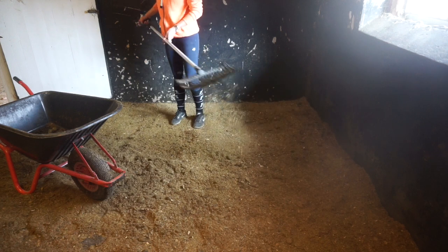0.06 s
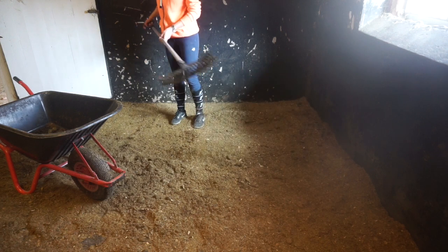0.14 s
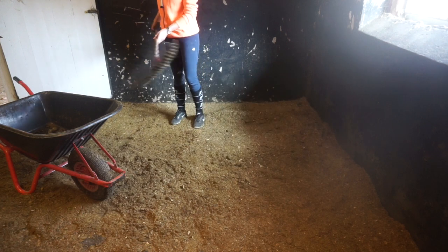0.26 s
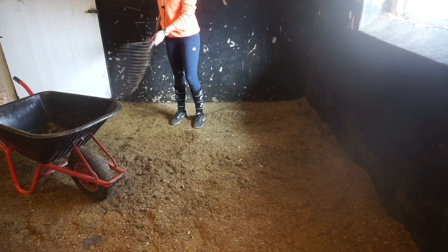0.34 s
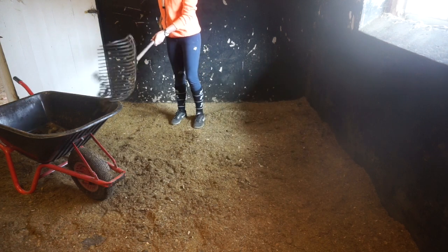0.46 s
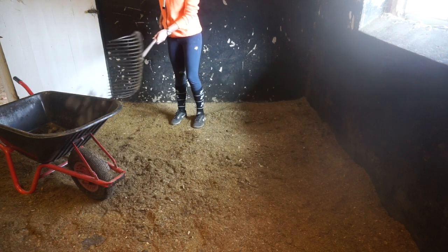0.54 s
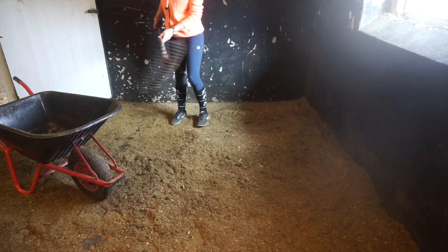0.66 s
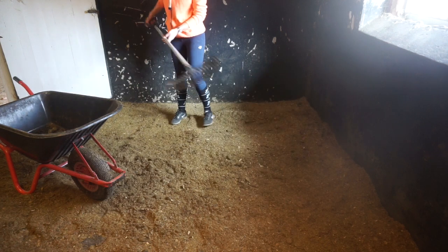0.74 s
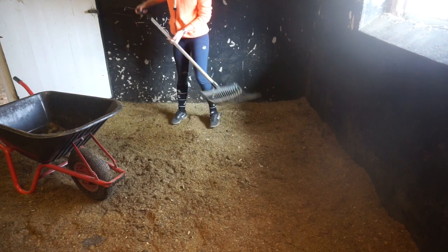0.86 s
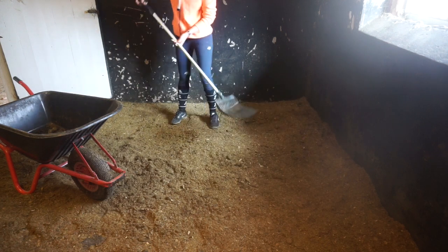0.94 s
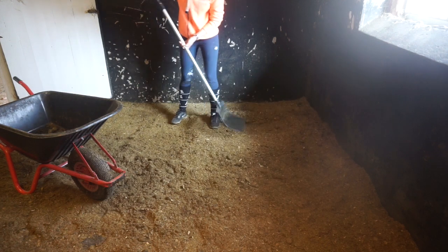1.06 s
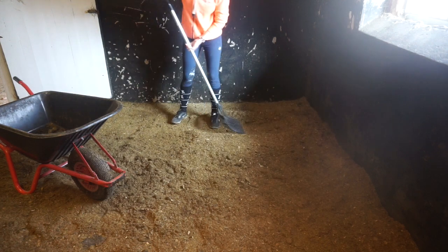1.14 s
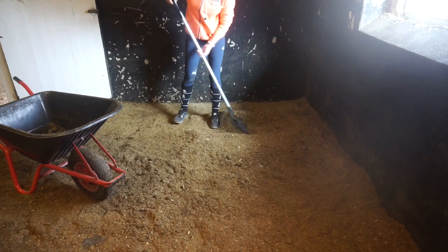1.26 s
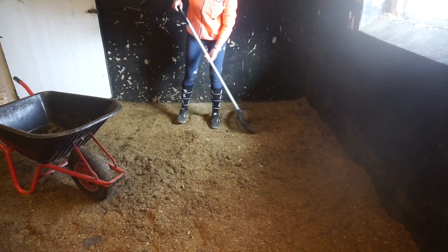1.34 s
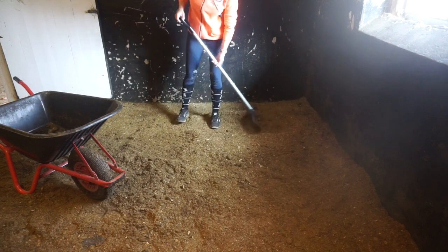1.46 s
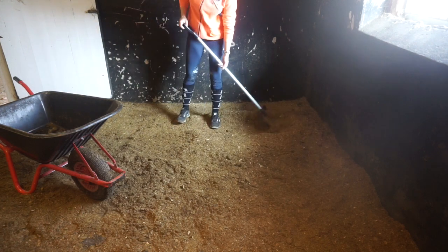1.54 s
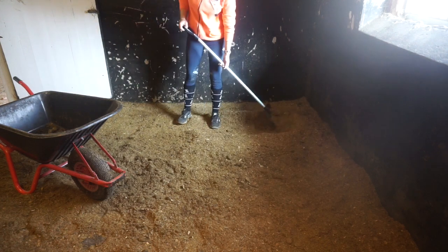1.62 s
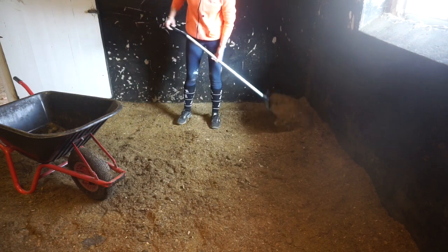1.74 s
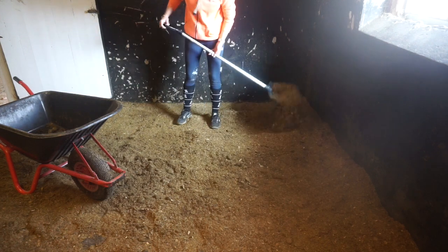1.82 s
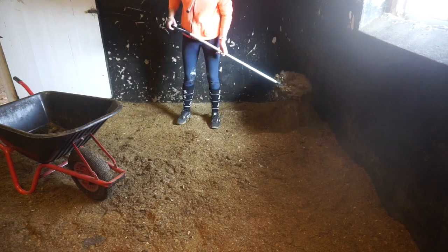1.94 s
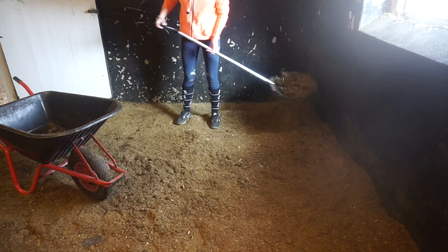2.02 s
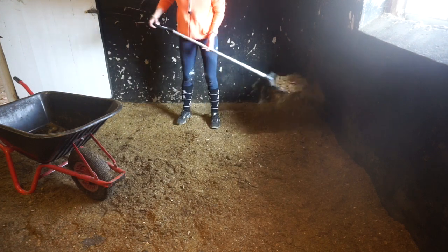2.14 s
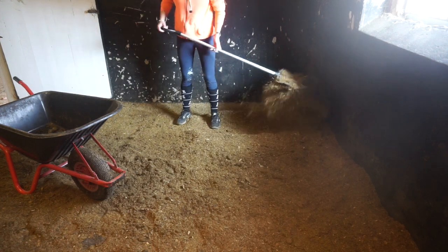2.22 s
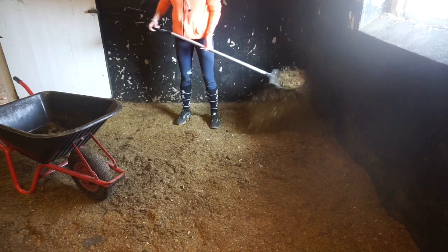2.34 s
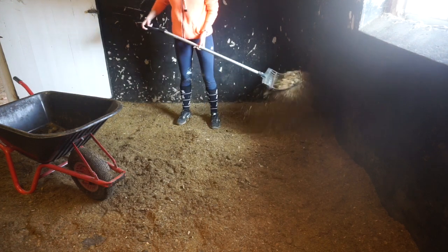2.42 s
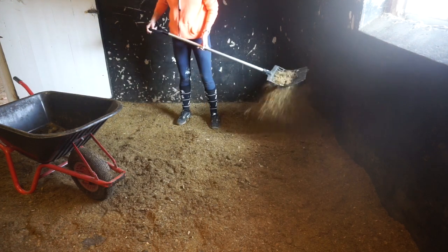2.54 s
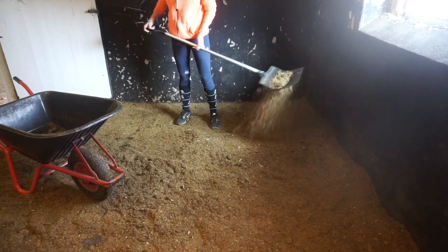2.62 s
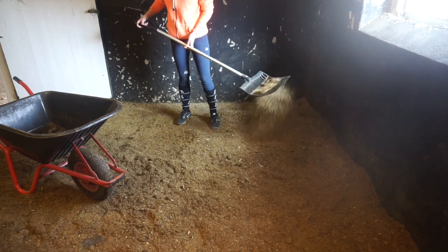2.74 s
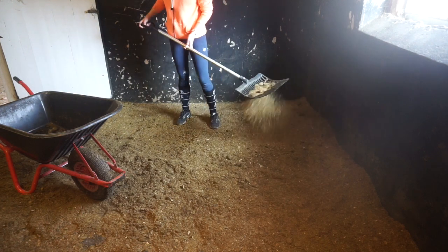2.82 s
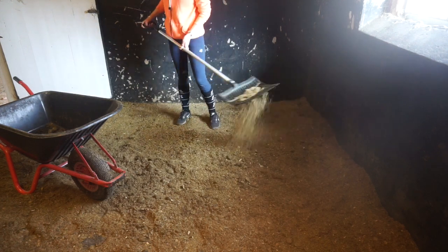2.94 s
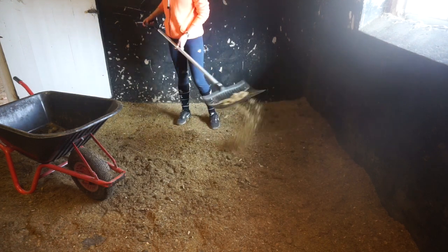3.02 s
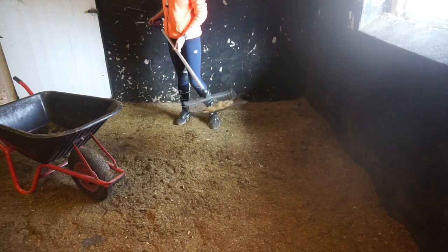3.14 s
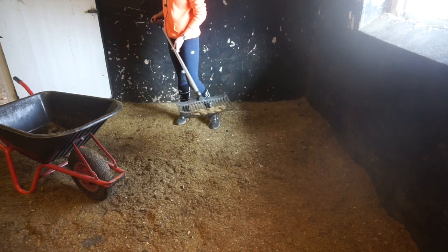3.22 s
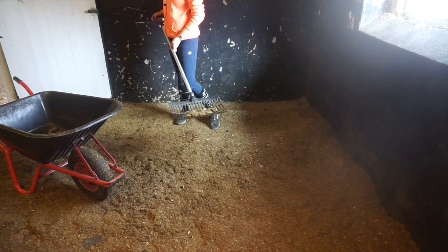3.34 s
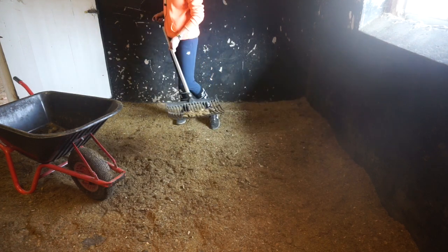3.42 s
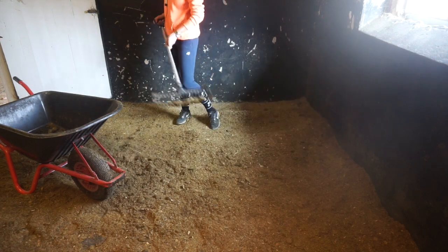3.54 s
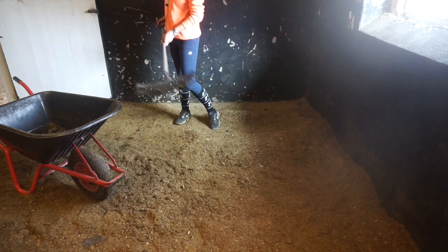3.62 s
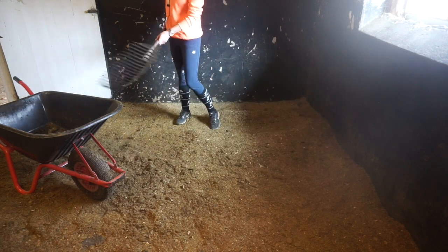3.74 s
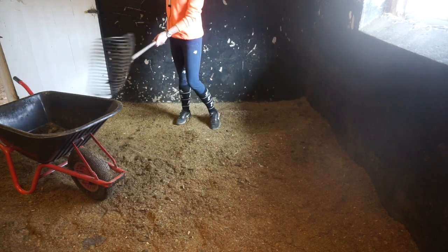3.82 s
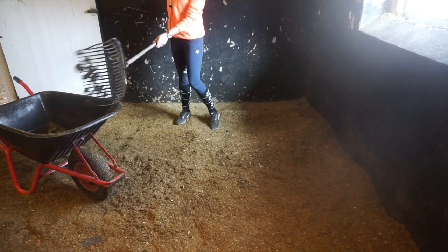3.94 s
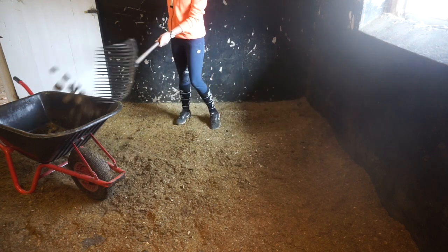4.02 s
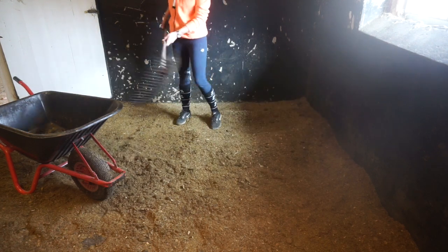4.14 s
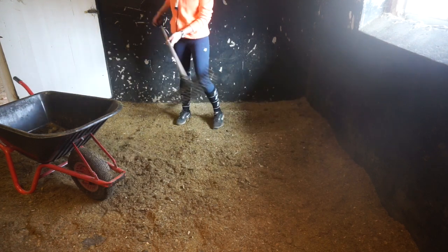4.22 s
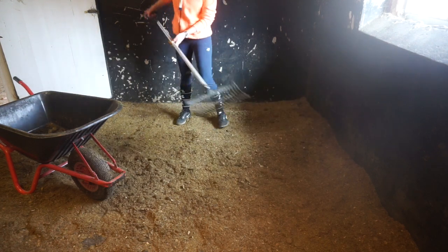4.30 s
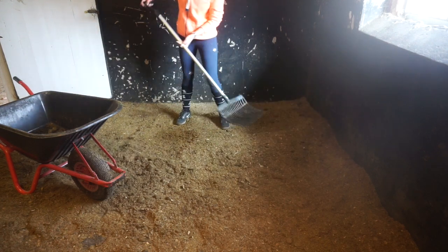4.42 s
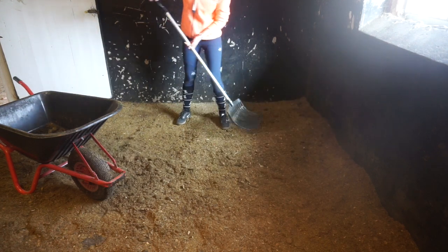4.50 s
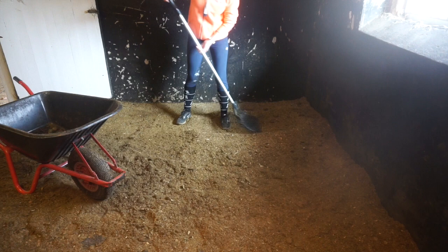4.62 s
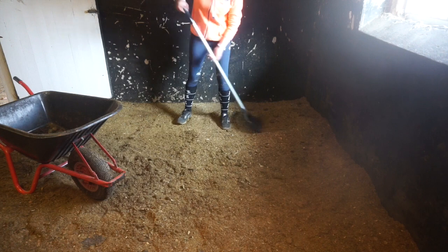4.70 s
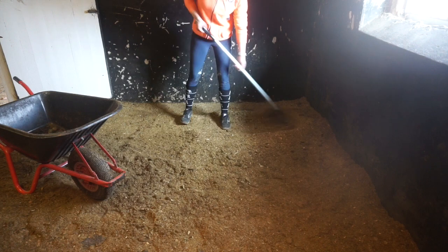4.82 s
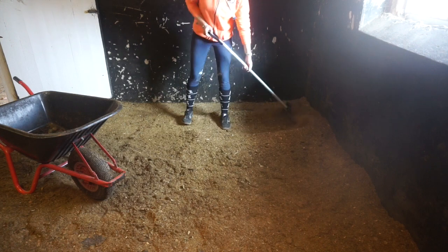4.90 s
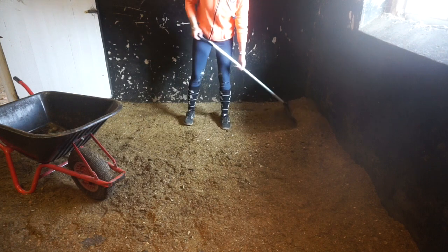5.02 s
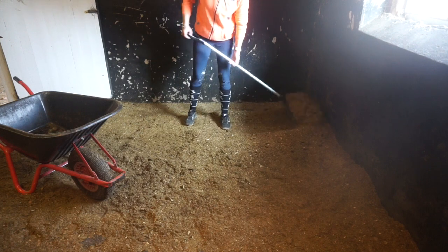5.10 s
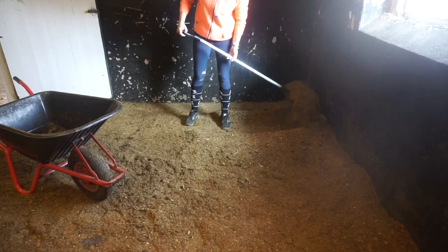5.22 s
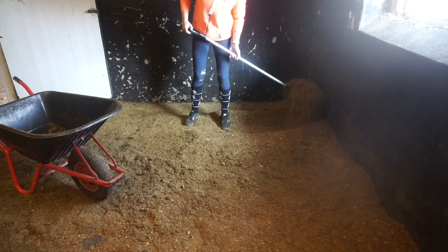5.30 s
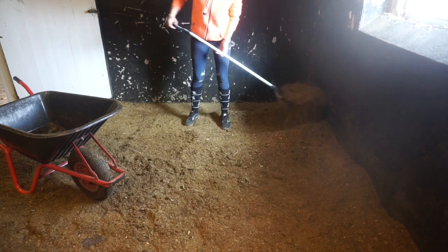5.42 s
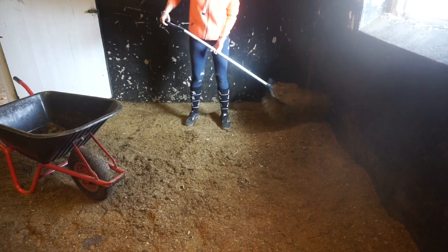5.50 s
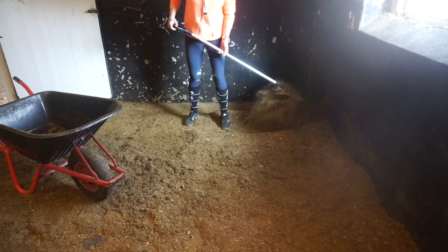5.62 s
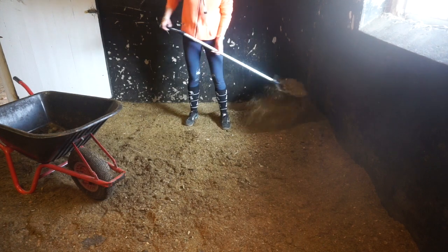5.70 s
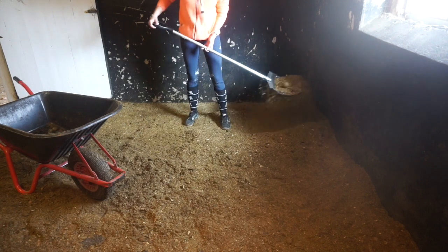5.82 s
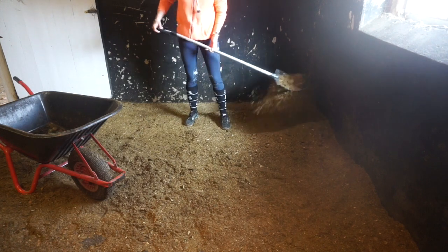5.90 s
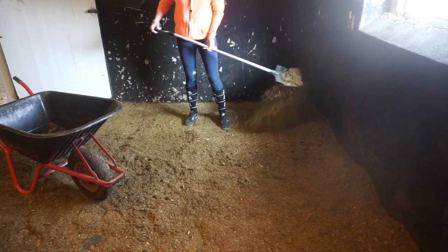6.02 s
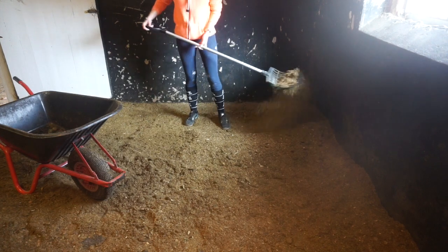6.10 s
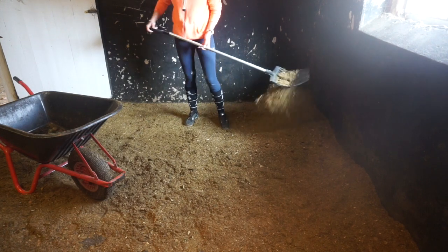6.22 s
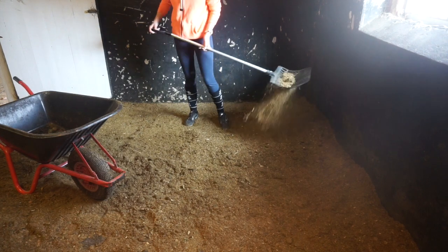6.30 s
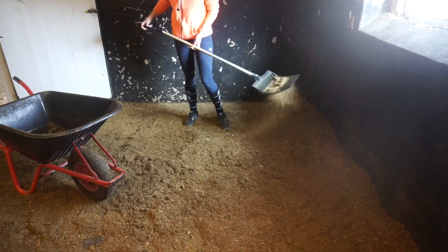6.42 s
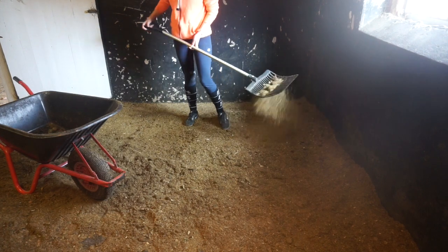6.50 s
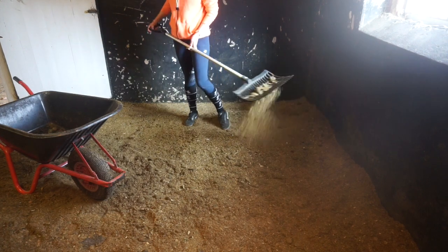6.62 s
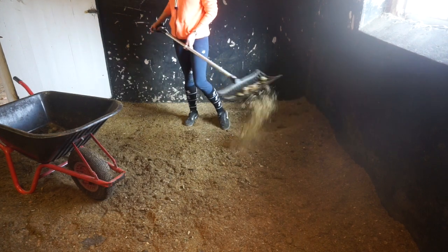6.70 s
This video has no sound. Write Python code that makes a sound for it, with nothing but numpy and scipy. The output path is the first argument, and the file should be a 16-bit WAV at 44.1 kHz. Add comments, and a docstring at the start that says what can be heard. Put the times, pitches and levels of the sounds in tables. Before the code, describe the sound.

A horse stall is mucked out a few metres away, with a short hard-walled echo and a soft steady hush. Wood shavings hiss faintly and a swish builds until a plastic-tined fork knocks on a wheelbarrow at 0.5 seconds; droppings thud into the hollow, ringing tub until about 0.9. At 1.3 the fork scrapes into the bedding with sharp tine snaps and a muffled crunch. From about 1.8 to 3.4 it is shaken repeatedly, flakes rustling quietly on the tines and hissing to the floor. At 4 seconds comes another loud knock, with rattling debris and several thuds, the heaviest at 4.3. A second, shorter scrape with two sharp snaps follows at 4.8. One more tine flicks at 5.4, then the rustling shakes and falling shavings continue to the end, near 6.8 seconds.

```python
"""Mucking out a horse stall.

A few metres off in a hard-walled stall, a plastic-tined fork and rattling debris knock on a wheelbarrow;
droppings thud into the ringing tub. The fork then scrapes into wood shavings and is shaken, so that
flakes rustle on the tines and hiss to the floor. Two rounds, over a steady hush."""
import sys
import numpy as np
from scipy import signal
from scipy.fft import rfft, irfft
from scipy.io import wavfile
from scipy.ndimage import uniform_filter1d

SR = 44100
rng = np.random.default_rng(int(sys.argv[2]) if len(sys.argv) > 2 else 0)


def int16_out(signal):
    """Quantize to a 16-bit WAV file."""
    q = np.round(np.clip(np.atleast_2d(signal).T, -1, 1) * 32767)
    wavfile.write(sys.argv[1], SR, q.astype(np.int16))


N = 297656
TIME_S = np.arange(N) / SR
AGE_S = TIME_S[:SR]
BINS_HZ = np.maximum(np.arange(N // 2 + 1) * SR / N, 1)

# boots, clumps and the flat of the fork on the bedding: (time [s], energy [dB])
BEDDING_PRESSES = [(1.41, -6.5), (1.5, -7), (2.35, -18.5), (2.53, -20), (3.518, -26), (5.701, -17.5),
                   (5.761, -22), (6.189, -26)]
# fork jolts and shakes: (peak time [s], decay [s], rustle [dB], falling flakes [dB])
FORK_SHAKES = [(.01, 0.1, -55, -44.5), (0.194, 0.14, -59, -50.5), (1.065, 0.036, -47, -72),
               (1.81, 0.13, -56, -57), (1.98, 0.11, -59, -53.5), (2.118, 0.15, -45, -47.5),
               (2.254, 0.093, -45, -58), (2.406, 0.11, -44.5, -42), (2.568, 0.15, -51.5, -47),
               (2.784, 0.21, -50, -42.5), (3.055, 0.064, -55, -44.5), (3.17, 0.084, -55.5, -47.5),
               (3.328, .08, -53.5, -50.5), (5.47, 0.043, -47, -45.5), (5.635, 0.15, -47, -53),
               (5.79, 0.26, -49.5, -45.5), (5.97, 0.018, -50, -49), (6.084, 0.055, -47.5, -52),
               (6.204, 0.21, -51.5, -47), (6.357, 0.11, -51.5, -52), (6.513, 0.17, -51.5, -44.5),
               (6.75, 0.067, -52, -46)]
# tines flicking free: (time [s], energy [dB])
TINE_FLICKS = [(0.071, -14), (1.35, 5), (1.459, 8.5), (1.5643, 2.5), (2.25, -17), (2.285, -17),
               (2.349, -11.5), (3.315, -23), (4.607, -16), (4.776, 9.5), (4.812, 10.5), (5.1239, -16),
               (5.2037, -16.5), (5.4014, 0.3)]
# pushes into the bedding: (bite time [s], length [s], scrape [dB], skim re scrape [dB], skim rise [dB/s])
FORK_SCOOPS = [(1.345, .24, -21, -8, 216), (4.775, 0.16, -15.5, -26.5, 76)]
# droppings landing: (time [s], energy [dB], place [0 bottom, 1 lip])
DROPPING_THUDS = [(0.503, -4.5, 0.32), (.63, -4, 0.3), (.685, -4.5, 1), (0.713, -5, 0.22), (.752, -3, 0.36),
                  (0.799, -4.5, 0.11), (0.834, -11, 0.055), (4.03, 4.5, 0.22), (4.105, -0.5, 0.99),
                  (4.3105, 12.5, 0.11), (4.362, 1.5, 0.011), (4.53, -11, 0)]
# hard knocks on the tub, from the fork or from rattling debris:
# (time [s], energy [dB], place [0 lip, 1 rim], tine ring re tub [dB], crack re tub [dB])
HARD_KNOCKS = [(0.486, 11.5, 0.25, 2, -3), (.580, -18.5, 0.17, -2, 18), (0.712, -6.5, 0.54, -9, 4),
               (4.0135, 11.5, 0.47, -24, -2), (4.045, 5, 1, -34, 1), (4.094, -3, 0.65, -25, 7),
               (4.16, -6, 0.41, -26, 6), (4.24, -12, 1, -21, 5), (4.3093, -10, 0.95, -5, 9)]

# plastic tub: (frequency [Hz], t60 [s], hit on lip [dB], hit on rim [dB], hit on bottom [dB])
TUB_MODES = [(154, 0.96, -28, -25, -1), (182, 0.83, -16, -16, -9), (217, 1, -42, 0, -21),
             (247.5, 0.082, -64, -24, 3.5), (305, 0.55, -38, -24, -10), (367.3, 0.14, -23, -16.5, -3),
             (403.6, 0.1, -4, -23, -18), (439.7, 0.14, -0.5, -19.5, -10.5), (485.5, 0.2, 10, -27, -18),
             (560, 0.089, 6.5, -30, -13), (596, 0.081, -17.5, 1, -17), (632, 0.51, -12, -30, -18),
             (866, .17, -16, 9, -43), (940, 0.081, 3.5, -10, -34), (1232, 0.064, -15, 9, -20),
             (1362, 0.013, 3, -2.5, -23), (1980, 0.051, -27, -10, -41), (2000, 0.071, -35, -14, -42)]
# fork head: (frequency [Hz], t60 [s], head knocked [dB], one tine flicked [dB])
TINE_MODES = [(1910, 0.011, -15, -14), (2204, 0.023, 0.5, -21), (2344, 0.069, 2.5, 3),
              (2500, 0.038, -22, 9), (2570, 0.02, -4, 9), (2840, 0.024, 9.5, -33), (3570, 0.023, -2.5, -21),
              (4320, 0.18, -9, 16)]

# noise spectra: (frequency [Hz], relative density [dB])
AIR_SPECTRUM = [(30, 0), (100, -14), (170, -20.5), (260, -14.5), (480, -3), (800, 1.5), (1300, 0.5),
                (2000, -1.5), (2600, -0.5), (5000, -6), (10000, -9.5), (16000, -12.5)]
PRESS_SPECTRUM = [(60, -23), (160, -7.5), (320, -5), (580, 3.5), (1000, -14), (4000, -29), (15000, -42)]
SWISH_SPECTRUM = [(100, -39), (450, -17.5), (900, -20), (1750, -16), (2250, -4), (2600, -7), (3200, -12),
                  (4800, -9), (7000, -18.5), (15000, -30)]
RUSTLE_SPECTRUM = [(100, -67), (300, -27.5), (600, -13.5), (900, -13.5), (1200, -5.5), (1550, -5.5),
                   (2100, -4), (2550, 1), (3300, -5), (4400, -4.5), (5500, -11), (15000, -21.5)]
FALL_SPECTRUM = [(100, -45), (300, -6.5), (800, -32), (2800, 7.5), (6000, 5), (10000, 6.5), (13500, 7),
                 (16000, -0.5)]
FLICK_SPECTRUM = [(150, -39), (500, -33), (900, -7), (1500, -2.5), (2400, 2.5), (3100, -3), (3750, 3),
                  (4800, -3.5), (7000, -15.5), (11000, -10.5), (12800, -8.5), (16000, -25)]
SCRAPE_SPECTRUM = [(100, -42), (430, -23), (900, -12), (1280, -2), (1480, -6), (1850, 1.5), (2100, -6),
                   (2600, 4.5), (3700, -0.5), (4400, 0), (6200, -8.5), (9000, -8.5), (13000, -14.5),
                   (16000, -25)]
CRUNCH_SPECTRUM = [(50, 16), (130, -48), (260, -12.5), (450, -9), (670, 12.5), (900, -1), (2000, -18.5),
                   (8000, -38)]
THUMP_SPECTRUM = [(40, -38), (90, -20.5), (150, -3), (250, -3.5), (350, 2), (550, -8), (850, -12.5),
                  (1200, -40), (3000, -37.5), (12000, -41.5)]
CRACK_SPECTRUM = [(80, -43), (280, -11), (650, 3), (1300, -2), (2500, -2), (4500, -13), (7000, -24),
                  (15000, -31)]

# stall reverberation: (frequency [Hz], t60 [s])
STALL_DECAY = [(120, 0.54), (300, 0.81), (700, 0.57), (2500, 0.46), (6000, 0.45), (14000, .3)]
# right microphone port ahead of the left: (frequency [Hz], phase [rad])
PORT_PHASE = [(60, 0.084), (350, 0.48), (1500, 0.85), (2600, 0.1), (4000, 0.88), (12000, 1)]

AIR_DB = -46
SWING_STOP_S, SWING_DB, SWING_RISE_DB_PER_S, SWING_FADE_DB_PER_S = 0.5, -27, 91, 83
SHAKE_RISE_RATIO, FALL_LAG_S, FALL_STRETCH = 0.51, 0.006, 1.22
BITE_S, PUSH_ARCH_DB, RELEASE_DB_PER_S = 0.0023, 3.5, 358
CRUNCH_ENTRY_DB, CRUNCH_DEEP_DB, CRUNCH_LAG_S = -23, -19.5, 0.023  # re scrape
HIGHPASS_HZ, LOWPASS_HZ = 149, 15900


def undb(db):
    """Decibels to gain."""
    return 10 ** (np.asarray(db) / 20)


def unit(x):
    """Scale to unit energy."""
    return x / np.sqrt(np.sum(x ** 2))


def along(points, hz):
    """Interpolate (Hz, value) points over log frequency."""
    point_hz, value = np.transpose(points)
    return np.interp(np.log(hz), np.log(point_hz), value)


def colour(x, spectrum, size=8192):
    """Minimum-phase filter; white input keeps its power."""
    gain = undb(along(spectrum, np.linspace(1, SR / 2, size // 2 + 1)))
    cepstrum = irfft(np.log(gain / np.sqrt(np.mean(gain ** 2))))
    cepstrum[1:size // 2] *= 2
    cepstrum[size // 2 + 1:] = 0
    response = irfft(np.exp(rfft(cepstrum)))
    return signal.oaconvolve(x, response)[:N]


def add(track, at_s, sound):
    """Mix a sound in at at_s."""
    start = max(int(at_s * SR), 0)
    track[start:start + len(sound)] += sound[:N - start]


def walk(rate_hz):
    """Slewed random steps, deviation near one."""
    hold = max(int(SR / rate_hz), 2)
    steps = rng.standard_normal(N)[np.arange(N) // hold]
    return 1.2 * uniform_filter1d(steps, hold)


def ramp(peak_s, rise_db_per_s, fade_db_per_s):
    """Gain rising to one at peak_s, then fading."""
    before_s, after_s = np.maximum(peak_s - TIME_S, 0), np.maximum(TIME_S - peak_s, 0)
    return undb(-rise_db_per_s * before_s - fade_db_per_s * after_s)


def surge(peak_s, decay_s):
    """Gain of one shake: Gaussian rise, exponential fade."""
    age = (TIME_S - peak_s) / decay_s
    return np.exp(-(np.minimum(age, 0) / SHAKE_RISE_RATIO) ** 2 - np.maximum(age, 0))


def stroke(at_s, length_s):
    """Gain of one push: sudden bite, arch of effort, quick release."""
    age_s = TIME_S - at_s
    bite = np.clip(age_s / BITE_S + 0.5, 0, 1)
    arch = np.sin(np.pi * np.clip(age_s / length_s, 0, 1))
    return bite * undb(PUSH_ARCH_DB * arch - RELEASE_DB_PER_S * np.maximum(age_s - length_s, 0))


def grains(rate_hz, spread_db):
    """Tiny snaps of wood flakes, a few much larger; unit rms."""
    size = undb(spread_db * np.minimum(rng.exponential(size=N), 5))
    snaps = (rng.random(N) < rate_hz / SR) * size * rng.choice([-1, 1], N)
    return snaps / np.std(snaps)


def burst(t60_s, rise_s):
    """Decaying contact noise, unit energy."""
    envelope = (1 - np.exp(-AGE_S / rise_s)) * np.exp(-np.log(1000) * AGE_S / t60_s)
    return unit(rng.standard_normal(SR) * envelope)


def ring(hz, t60_s, db):
    """Damped modes after one blow, unit energy."""
    gain = rng.choice([-1, 1], len(hz)) * undb(db) / np.sqrt(t60_s)
    fade = np.exp(-np.log(1000) * AGE_S / t60_s[:, None])
    return unit(gain @ (fade * np.sin(2 * np.pi * hz[:, None] * AGE_S)))


def port_noise(spacing_m, size):
    """Diffuse noise at two ports: alike in the bass, unrelated in the treble."""
    coherence = np.sinc(2 * np.linspace(0, SR / 2, size // 2 + 1) * spacing_m / 343)
    mid, side = rfft(rng.standard_normal((2, size))) * np.sqrt([(1 + coherence) / 2, (1 - coherence) / 2])
    return irfft(np.array([mid + side, mid - side]), size)


def stall(x, wet_db, early_db):
    """Direct sound, early floor and wall reflections, and a tail whose treble dies first."""
    noise = port_noise(spacing_m=0.045, size=2 * SR)
    hz, frame_s, cells = signal.stft(noise[:, :SR], SR, nperseg=256)
    t60_s = along(STALL_DECAY, np.maximum(hz, 1))[:, None]
    _, tail = signal.istft(cells * np.exp(-np.log(1000) * frame_s / t60_s), SR)
    tail = tail[:, :SR] * (1 - np.exp(-AGE_S / 0.0044))
    early = noise[:, SR:] * np.exp(-AGE_S / 0.0081) * (1 - np.exp(-AGE_S / 0.00052))
    response = np.sqrt(2) * (undb(wet_db) * unit(tail) + undb(early_db) * unit(early))
    response[:, 0] += 1  # direct path
    return signal.oaconvolve(x[None], np.sqrt(2) * unit(response), axes=1)[:, :N]


def wide(source, wet_db, early_db, parts):
    """Wide source: independent parts, each with its own reflections."""
    return sum(stall(source(), wet_db, early_db) for _ in range(parts)) / np.sqrt(parts)


def air():
    """Soft, steady, diffuse hush of the barn."""
    hush = np.array([colour(port, AIR_SPECTRUM) for port in port_noise(spacing_m=0.28, size=N)])
    return hush * undb(AIR_DB + 0.04 * walk(rate_hz=7))


def presses():
    """Weight on the bedding: a muffled crunch."""
    crunches = np.zeros(N)
    for at_s, db in BEDDING_PRESSES:
        add(crunches, at_s, undb(db) * burst(t60_s=0.19, rise_s=0.014))
    return colour(crunches, PRESS_SPECTRUM)


def swing():
    """The first load slides off the tines; the swish grows until the fork stops."""
    speed = ramp(SWING_STOP_S, SWING_RISE_DB_PER_S, SWING_FADE_DB_PER_S)
    return undb(SWING_DB) * colour(grains(rate_hz=15000, spread_db=2) * speed, SWISH_SPECTRUM)


def sifting():
    """Flakes rustle on the shaken tines and hiss to the floor; shakes add in power."""
    rustle_power, fall_power = np.zeros((2, N))
    for peak_s, decay_s, rustle_db, fall_db in FORK_SHAKES:
        rustle_power += (undb(rustle_db) * surge(peak_s, decay_s)) ** 2
        fall_power += (undb(fall_db) * surge(peak_s + FALL_LAG_S, decay_s * FALL_STRETCH)) ** 2
    fall = grains(rate_hz=9000, spread_db=3.5) * np.sqrt(fall_power) * undb(1.3 * walk(rate_hz=40))
    rustle = grains(rate_hz=2500, spread_db=3) * np.sqrt(rustle_power) * undb(0.4 * walk(rate_hz=52))
    return undb(4) * colour(fall, FALL_SPECTRUM) + undb(6.5) * colour(rustle, RUSTLE_SPECTRUM)


def flicks():
    """A snagged tine springs free: sharp snap, faint ring."""
    hz, t60_s, _, flicked_db = np.transpose(TINE_MODES)
    snaps, rings = np.zeros((2, N))
    for at_s, db in TINE_FLICKS:
        add(snaps, at_s, undb(db) * burst(t60_s=0.028, rise_s=0.00027))
        add(rings, at_s, undb(db) * ring(hz, t60_s, flicked_db))
    return colour(snaps, FLICK_SPECTRUM) + undb(-12.5) * rings


def scoops():
    """Tines skim, then catch and slip through the flakes; the packed layer crunches more with depth."""
    push, depth = np.zeros((2, N))
    for at_s, length_s, db, skim_db, rise_db_per_s in FORK_SCOOPS:
        skim = undb(skim_db) * ramp(at_s, rise_db_per_s, RELEASE_DB_PER_S)
        push += undb(db) * (stroke(at_s, length_s) + skim)
        crunch_db = np.interp(TIME_S, [at_s, at_s + length_s], [CRUNCH_ENTRY_DB, CRUNCH_DEEP_DB])
        depth += undb(db + crunch_db) * stroke(at_s + CRUNCH_LAG_S, length_s)
    catch = undb(0.68 * walk(rate_hz=170))
    scrape = colour(grains(rate_hz=7000, spread_db=2.5) * push * catch, SCRAPE_SPECTRUM)
    crunch = colour(grains(rate_hz=1800, spread_db=3.5) * depth * catch, CRUNCH_SPECTRUM)
    return scrape + crunch


def thuds():
    """Soft droppings drum in the tub, deepest on its bottom."""
    hz, t60_s, lip_db, _, bottom_db = np.transpose(TUB_MODES)
    rings, thumps = np.zeros((2, N))
    for at_s, db, place in DROPPING_THUDS:
        add(rings, at_s, undb(db) * ring(hz, t60_s, bottom_db + place * (lip_db - bottom_db)))
        add(thumps, at_s, undb(db) * burst(t60_s=0.14, rise_s=0.00055))
    return undb(-2.5) * rings + undb(-2) * colour(thumps, THUMP_SPECTRUM)


def knocks():
    """Hard knocks from the fork or rattling debris: crack, tine ring, tub ring set by the place hit."""
    tub_hz, tub_t60_s, lip_db, rim_db, _ = np.transpose(TUB_MODES)
    tine_hz, tine_t60_s, knocked_db, _ = np.transpose(TINE_MODES)
    rings, cracks = np.zeros((2, N))
    for at_s, db, place, tine_db, crack_db in HARD_KNOCKS:
        add(rings, at_s, undb(db) * ring(tub_hz, tub_t60_s, lip_db + place * (rim_db - lip_db)))
        add(rings, at_s, undb(db + tine_db) * ring(tine_hz, tine_t60_s, knocked_db))
        add(cracks, at_s, undb(db + crack_db) * burst(t60_s=0.099, rise_s=0.00038))
    return rings + colour(cracks, CRACK_SPECTRUM)


def scene():
    """Fork work in the stall; wheelbarrow slightly left."""
    digging = undb(-0.1) * wide(scoops, wet_db=-4, early_db=2.5, parts=4)
    shaking = undb(-0.37) * wide(sifting, wet_db=-3.5, early_db=-0.5, parts=3)
    handling = undb(-1) * stall(swing() + presses(), wet_db=2.5, early_db=2)
    snapping = undb(2) * wide(flicks, wet_db=1, early_db=-5, parts=2)
    knocking = wide(knocks, wet_db=6, early_db=6.5, parts=2)
    thudding = stall(thuds(), wet_db=-2, early_db=2)
    pan_left = undb([[0.7], [-0.7]])
    barrow = undb(0.2) * pan_left * (knocking + thudding)
    return air() + handling + shaking + snapping + digging + barrow


def record(dry):
    """Two-port microphone: small phase offset, deep bass and top cut."""
    phase_rad = along(PORT_PHASE, BINS_HZ) * np.array([[-0.5], [0.5]])
    ports = irfft(rfft(dry) * np.exp(1j * phase_rad), N)
    highpass = signal.butter(3, HIGHPASS_HZ, "highpass", fs=SR, output="sos")
    lowpass = signal.ellip(10, 0.2, 70, LOWPASS_HZ, fs=SR, output="sos")
    return signal.sosfilt(lowpass, signal.sosfilt(highpass, ports))


dry = scene()
out = record(dry)
int16_out(out)
```